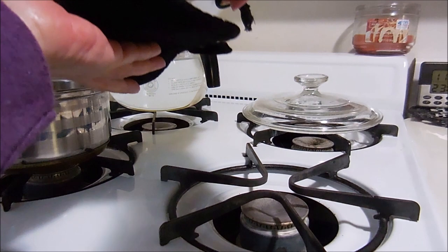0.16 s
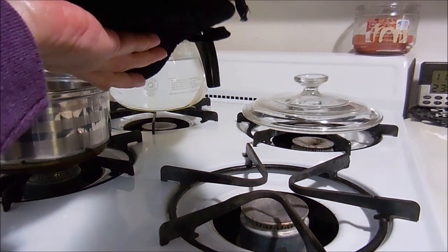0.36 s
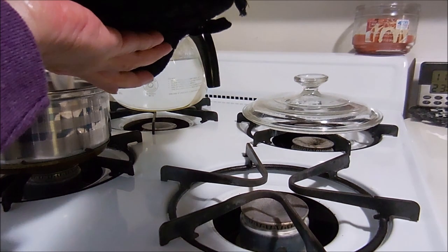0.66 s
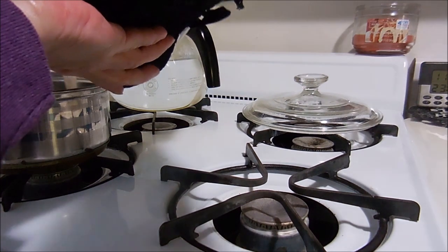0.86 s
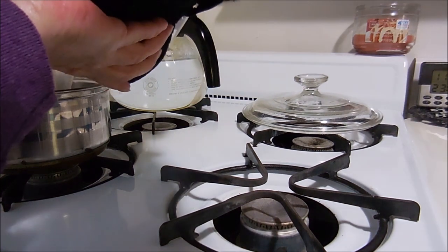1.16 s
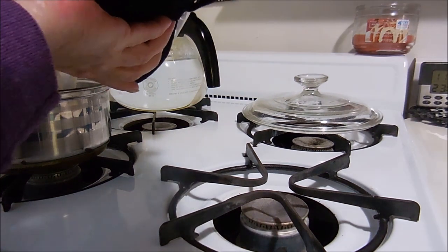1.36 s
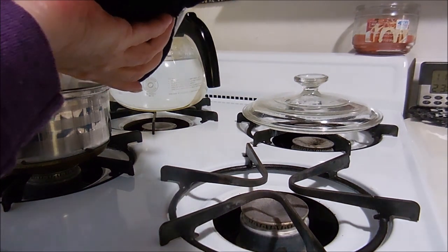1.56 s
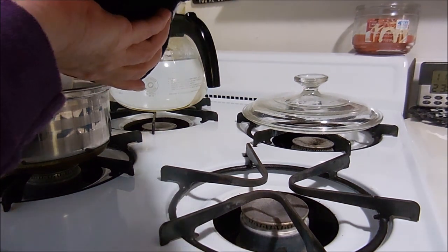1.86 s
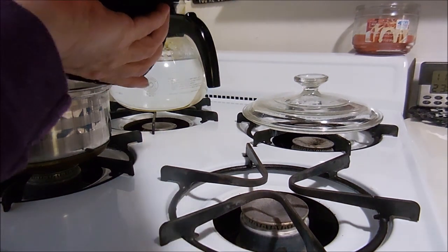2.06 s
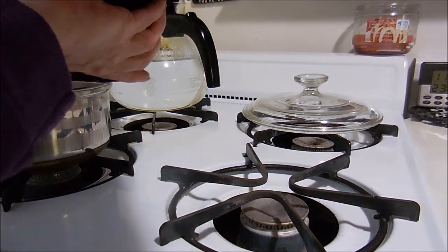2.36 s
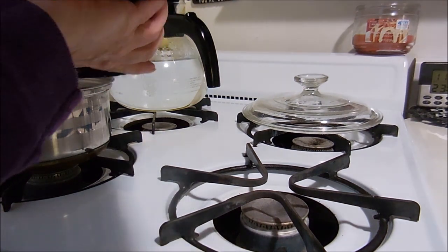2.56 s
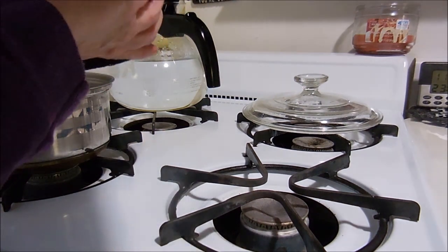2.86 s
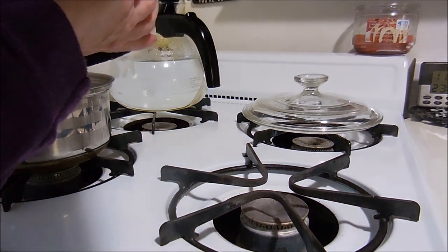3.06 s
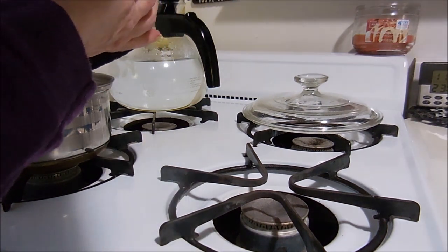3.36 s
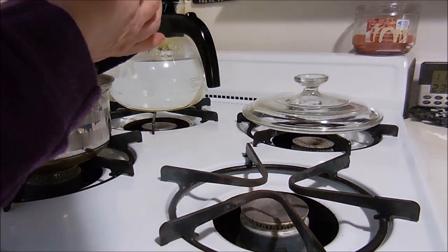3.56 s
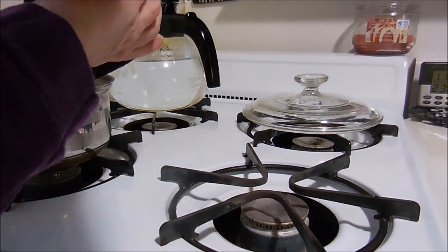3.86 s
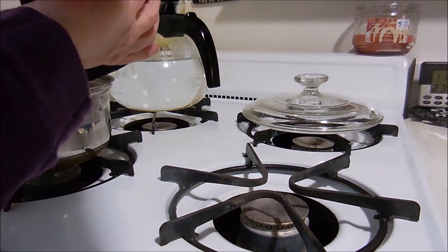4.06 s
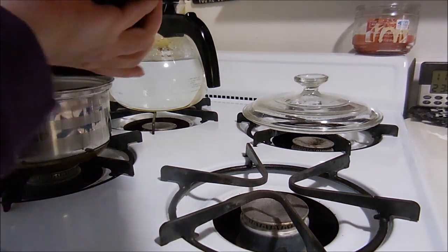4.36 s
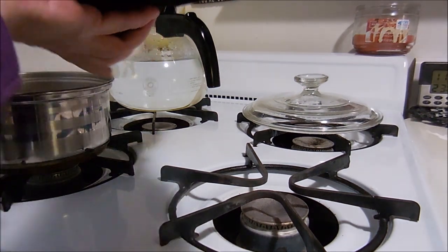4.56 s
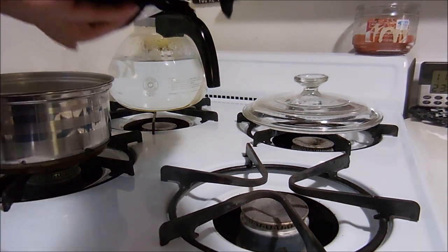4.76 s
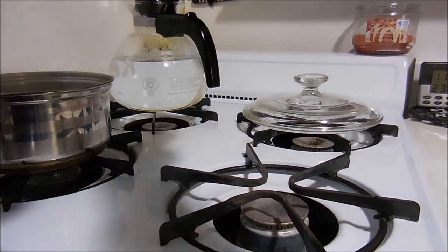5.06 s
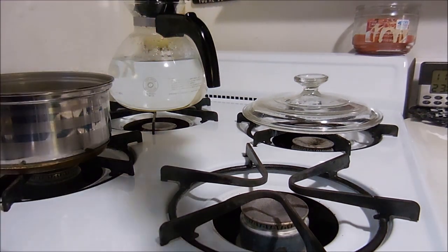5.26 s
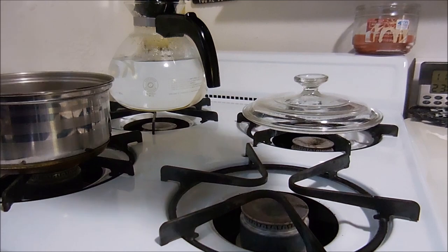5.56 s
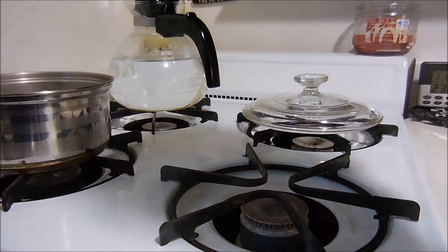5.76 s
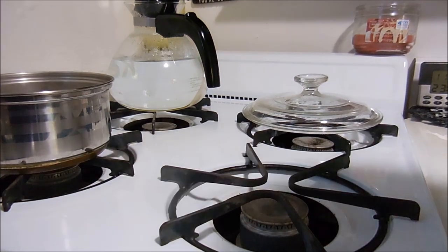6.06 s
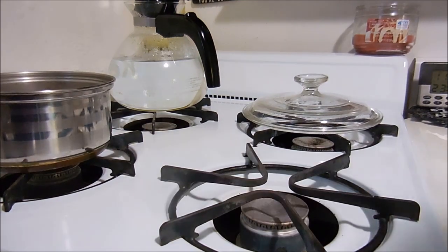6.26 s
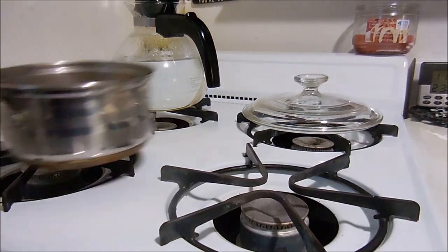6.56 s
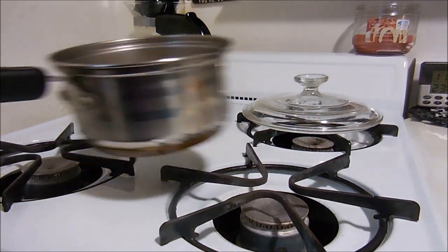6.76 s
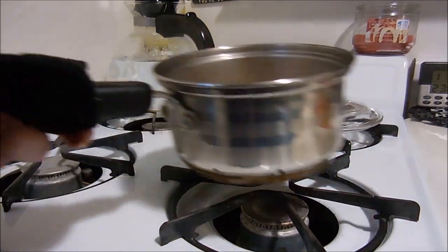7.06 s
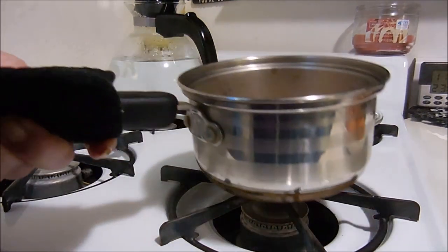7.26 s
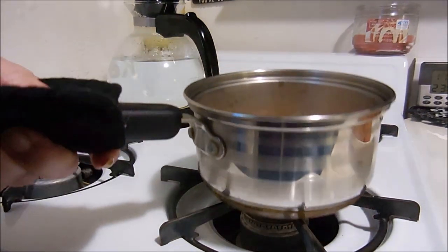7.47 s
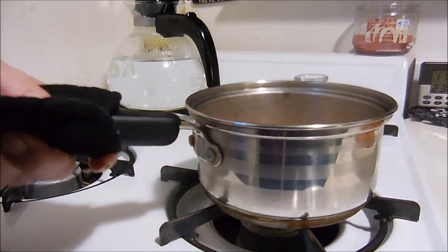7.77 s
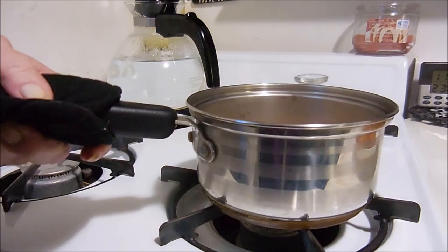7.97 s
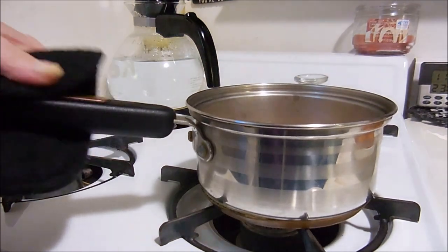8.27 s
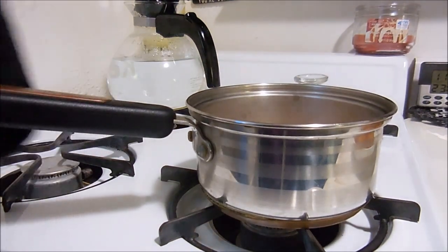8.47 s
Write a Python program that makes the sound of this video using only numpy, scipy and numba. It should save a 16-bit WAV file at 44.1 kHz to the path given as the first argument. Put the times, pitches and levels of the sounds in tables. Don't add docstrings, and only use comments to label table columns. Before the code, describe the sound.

Close stereo pickup in a small, hard kitchen, with quiet hiss and deep rumble. At about 0.5 s a dish clinks softly on a steel saucepan, with tiny dull bounces. Thick liquid slides in, its surges sloshing hollowly and gurgling, heaviest near 1.3 s and renewed around 1.9-2.1 s, with crisp spatters and spray off the metal wall. From 2.4 s it thins to a glugging trickle; a loud wide splash at 2.9 s leads into rapid round pops until about 3.65 s. Spray stops by 4 s, leaving near quiet but for faint dribbling around 4.8 s and a drip at 5. At 6.2-6.5 s the pan tugs, jolts sharply and scrapes off iron. Drips tick around 7. At 7.6 s it lands with a loud, bright, quickly damped clank, rocks with uneven knocks and pings until a firm seat at 8.07 s, then drags faintly. Slightly stronger rumble remains at the end.

```python
import sys
import numpy as np
from scipy import signal
from scipy.fft import rfft, irfft, next_fast_len
from scipy.io import wavfile
from scipy.ndimage import uniform_filter1d
from numba import njit

SR = 44100
rng = np.random.default_rng(int(sys.argv[2]) if len(sys.argv) > 2 else 0)


def materialize(psi):
    bounded = np.clip(np.atleast_2d(psi).T, -1, 1)
    quanta = np.round(bounded * 32767).astype(np.int16)
    wavfile.write(sys.argv[1], SR, quanta)


def volts_from_decibels(level):
    exponent = np.asarray(level, float) / 20
    return 10 ** exponent


N = 380583

# (time [s], level [dB])
RUMBLE = [
    (0, -60.5),
    (.5, -63),
    (2.6, -61),
    (3.9, -56),
    (6.6, -60),
    (7.0, -53.5),
    (8.63, -51.5),
]
# (frequency [Hz], level [dB per Hz])
ROOM_TONE = [(32, -18), (55, -36), (65, -11.5), (264, -13.5), (360, -13), (406, -13.5), (933, -13),
             (1050, -12.5), (1570, -15), (2200, -13.5), (5820, -17.5), (15100, -18.5), (16200, -15)]
# (frequency [Hz], level [dB])
PORTS_FAR = [(60, -17), (110, -2), (200, 1), (380, -3.5), (700, 0.5), (1290, -1), (2380, 1), (4400, 2),
             (8120, 0), (15000, 0.5)]
# (frequency [Hz], level [dB])
PORTS_CLOSE = [(60, -11), (110, -12), (200, -16), (380, -16), (700, -13), (1290, -12), (2380, -6),
               (4400, -2), (8120, -1), (15000, 1)]

# (time [s], peak [dB], brightness [dB], damping [0-1], low-mode weight [dB])
DISH_KNOCKS = [
    (.459, -26.5, -4, 0.04, -2.5),
    (.481, -37.5, -12, 0, -15),
    (.508, -39.5, -9, 0, -4),
    (.53, -46, -8.5, .1, -8),
]
# (frequency [Hz], level [dB], t60 [s])
DISH_KNOCK_MODES = [(345, 3.5, 0.24), (748, 10, 0.25), (930, 4, 0.23), (1110, 3, 0.22), (1490, 3, 0.2),
                    (1668, 2, 0.21), (2220, -6, 0.15), (2690, -8, 0.44), (3500, 2, 0.13), (4620, 8.5, 0.051),
                    (6080, 7, 0.046)]
# (frequency [Hz], level [dB per Hz])
DISH_COLOUR = [(59, -43), (100, -19), (350, -10), (648, -14), (1130, 2.5), (1390, -20), (2170, -14),
               (3780, -24.5), (6290, -24), (16000, -24)]

# (time [s], peak [dB], brightness [dB], damping [0-1], low-mode weight [dB])
LIFT_JOLTS = [
    (6.276, -16, 5, 0.15, -5),
    (6.284, -17.5, 3, 0.21, -1),
]
# (frequency [Hz], level [dB], t60 [s])
SIDE_GRATE_MODES = [(271, -4, 0.2), (448, -5, 0.18), (899, 2, 0.11), (1130, -3, 0.18), (1310, -4, 0.2),
                    (1615, -16, 0.15), (1730, -7, 0.15), (1860, -7.5, 0.22), (2260, 4, 0.14),
                    (2700, 11, 0.067), (2750, -9, 0.52), (3070, -4, .12), (3780, -3.5, 0.18),
                    (4800, -6, .1)]
# (frequency [Hz], level [dB per Hz])
SIDE_GRATE_COLOUR = [(47, -51.5), (80, -5.5), (453, 1.5), (604, -0.5), (882, -2.5), (1540, -1.5),
                     (1800, -3), (2400, -6), (10900, -8.5), (16200, -8.5)]
# (time [s], hold [s], pressure [dB], edge against body [dB])
SCRAPES = [
    (6.196, 0.012, -34.5, -11),
    (6.227, 0.016, -53, -4),
    (6.367, 0.021, -46, -7),
    (6.394, 0.034, -41, -4.5),
    (6.436, 0.047, -39, -5),
    (8.143, 0.088, -55, -0.5),
    (8.258, 0.11, -55, 1.5),
]
# (frequency [Hz], level [dB per Hz])
SCRAPE_COLOUR = [(59, -53), (100, -30), (463, -5.5), (561, -13.5), (1260, -6), (2050, -13), (9120, -21),
                 (10600, -23.5), (14600, -20), (16200, -33)]

# (time [s], peak [dB], brightness [dB], damping [0-1], low-mode weight [dB])
LANDING = [
    (7.61, -1.5, -7, 0.17, 1),
    (7.618, -6, 9, 0.13, -3),
    (7.629, -11.5, -1.5, 0.054, -2.5),
    (7.641, -19.5, -0.5, 0.08, 0.5),
]
# (frequency [Hz], level [dB], t60 [s])
GRATE_MODES = [(1013, 1.5, 0.094), (1093, 9.5, 0.06), (1150, -2, 0.18), (1257, 4, 0.062), (1340, -2, 0.21),
               (1600, -13, 0.26), (1880, -13.5, 0.16), (2277, -4.5, 0.22), (2895, 4.5, 0.081),
               (3225, -8.5, 0.23), (3600, -15, 0.45), (4188, -9, 0.11), (5028, -18, .15), (6115, -7, .086)]
# (frequency [Hz], level [dB per Hz])
GRATE_COLOUR = [(35, -53), (60, -28), (262, -16), (410, -13), (506, -21.5), (686, -16.5), (1070, -1),
                (1710, -10.5), (2060, -7), (3450, -12.5), (4680, -9), (8810, -9.5), (13800, -14.5),
                (16200, -22)]
# (time [s], peak [dB], brightness [dB], damping [0-1], low-mode weight [dB])
ROCKS = [
    (7.807, -13.5, -9.5, 0.31, 0),
    (7.825, -20, -14, .2, 4),
    (7.846, -11, -11, 0.033, -1.5),
    (7.881, -23, -11, 0.077, -7.5),
    (7.927, -17.5, -11, 0.085, -7.5),
    (7.991, -41, -15.5, .1, 6),
    (8.069, -13, -11, 0.24, -3),
]
# (frequency [Hz], level [dB], t60 [s])
ROCK_MODES = [(1071, 10, 0.067), (1150, 3, 0.11), (1283, 2.5, 0.11), (1330, 4, 0.14), (1400, -0.5, 0.19),
              (1990, -13, 0.14), (2220, 1.5, 0.091), (2570, -4, 0.089), (2650, -7, 0.19), (2970, -8.5, .14),
              (3200, -12, .14), (3860, -12, 0.099), (4550, -3.5, 0.25), (4530, -12, 0.21)]
# (frequency [Hz], t60 [s])
METAL_DECAY = [(100, 0.62), (400, 0.32), (1200, 0.23), (4000, 0.3), (9000, 0.056), (16000, 0.29)]
# (time [s], peak [dB], frequency [Hz], ring [s])
PINGS = [(6.395, -45, 2770, 0.12), (6.455, -42, 2800, .12), (6.51, -54, 2700, .3), (6.413, -40, 900, .1),
         (6.435, -38, 1150, .1), (6.456, -33, 1220, .08), (6.448, -45, 4800, .15),
         (6.212, -36, 2950, 0.027), (6.58, -59, 2770, .3), (6.278, -27, 3990, 0.088),
         (6.28, -29, 1852, 0.14), (7.615, -25, 396, 0.15), (7.62, -21, 2902, 0.092),
         (7.629, -16, 3050, .04), (7.622, -19, 2650, .05), (7.63, -27, 3225, 0.14),
         (.46, -47.5, 3500, 0.31), (.46, -40, 2220, .07), (.62, -59, 3500, .3), (1.36, -38.5, 770, 0.18),
         (7.611, -22, 6200, .04), (7.807, -19, 6380, .045), (7.822, -24.5, 2960, 0.055),
         (7.846, -16.5, 6700, 0.035), (7.847, -25.5, 2200, .08), (7.865, -29, 4550, .13),
         (7.895, -32, 4900, .1), (7.881, -17.5, 1330, 0.046), (7.927, -17, 6300, .03),
         (7.928, -22, 6400, 0.033), (7.927, -21, 2540, 0.056), (7.929, -27.5, 1992, 0.14),
         (7.94, -32, 4700, 0.15), (7.96, -43, 4900, .12), (7.99, -35, 1393, 0.059),
         (8.07, -26, 2568, 0.082), (8.07, -23.5, 3040, 0.067), (8.07, -35, 760, .08),
         (8.073, -23, 6750, 0.04), (8.074, -36, 4550, 0.12)]

# (time [s], peak [dB], centre [Hz])
SPATTERS = [(0.793, -18, 7140), (0.927, -32, 3150), (1.061, -35, 5840), (1.197, -35.5, 10600),
            (1.2284, -40, 4170), (1.347, -26, 5340), (1.414, -35, 2570), (1.517, -34.5, 12900),
            (1.539, -34, 5700), (1.7614, -43, 9700), (1.9837, -31, 7000), (2.216, -23, 5200),
            (2.8598, -28, 4300), (2.9672, -33, 12900), (3.0928, -26, 9800), (3.135, -24.5, 8260),
            (3.3194, -33, 10100), (3.4524, -24, 3660), (3.548, -40.5, 2900), (3.637, -37, 4100),
            (3.698, -39.5, 12800), (5.045, -34, 5940), (6.794, -36.5, 8300), (6.994, -24.5, 6870),
            (7.069, -35.5, 2220), (7.2333, -39.5, 13500), (7.2585, -42.5, 4830), (7.318, -35, 13200),
            (7.324, -38.5, 4480), (7.529, -31.5, 12000)]
# (time [s], peak [dB], centre [Hz], width [octaves], ring [s])
SPLASHES = [
    (1.205, -33, 5550, 0.8, 0.58),
    (1.265, -39, 4200, 0.67, 0.22),
    (1.875, -31, 5400, 0.79, 0.82),
    (2.166, -29, 2900, .4, 0.017),
    (2.88, -33, 7100, 0.23, 0.025),
    (2.011, -28, 7800, 0.34, .04),
    (2.909, -18, 10500, 1, 0.045),
    (2.911, -32.5, 2620, 1.0, 0.056),
    (3.452, -24.5, 9600, 0.5, .036),
]
# (time [s], peak [dB], centre [Hz])
FLICKS = [(1.0133, -43, 11700), (1.2682, -31, 9310), (1.3465, -31.5, 11500), (1.4084, -36.5, 12000),
          (1.5022, -37, 13500), (1.581, -31.5, 12300), (1.601, -36, 11500), (1.8289, -33, 8000),
          (1.8614, -35, 11600), (1.9821, -28.5, 13500), (2.1033, -31, 9500), (2.1333, -36, 9090),
          (2.1657, -28.5, 6400), (2.3428, -33, 10300)]
# (time [s], peak [dB], frequency [Hz], ring [s], glide [share])
BUBBLES = [(.619, -42, 870, 0.031, 0.049), (1.037, -46, 755, 0.049, .08),
           (1.308, -28.5, 1745, 0.019, 0.094), (1.346, -35.5, 746, 0.033, -0.041),
           (1.689, -33, 820, 0.019, 0.23), (1.690, -34, 1130, 0.012, 0.009),
           (1.758, -38.5, 1820, 0.024, 0.093), (1.818, -40, 2450, .015, 0.062),
           (1.825, -36.5, 1670, 0.028, -0.45), (1.836, -38.5, 940, 0.02, 0), (1.908, -38, 800, 0.036, .25),
           (1.905, -39, 420, 0.066, .2), (1.935, -38.5, 475, 0.063, -.2), (2.01, -45, 480, 0.075, 0),
           (1.93, -43, 705, .04, .2), (1.96, -33, 2600, .012, .2), (2.038, -39, 2550, .015, .1),
           (1.942, -29.5, 1750, .016, -0.064), (1.952, -29, 1686, 0.045, 0.019),
           (2.007, -30, 899, 0.036, 0.043), (2.037, -38, 1110, 0.033, 0.21),
           (2.113, -36, 1650, .025, -0.0094), (2.113, -38, 930, 0.022, 0.11), (2.128, -43, 1150, .04, .4),
           (2.176, -36, 2750, .02, 0), (2.183, -34, 1840, .025, 0), (2.213, -29.5, 1400, 0.012, -0.038),
           (2.215, -28, 1815, 0.015, 0.074), (2.212, -35, 3600, 0.037, 0.0022),
           (2.449, -42, 930, 0.027, 0.12), (2.55, -41, 958, 0.051, 0.023), (2.874, -41, 1150, 0.027, 0.038),
           (2.905, -38.5, 764, 0.04, 0.0049), (2.907, -36.5, 954, 0.028, 0.021)]
# (time [s], peak [dB], frequency [Hz])
DROPS = [(1.0355, -39, 3490), (1.5813, -33.5, 3090), (1.6147, -36, 3500), (2.0145, -33, 3150),
         (2.0805, -31, 3200), (2.522, -31.5, 3500), (3.0804, -39, 3430), (3.829, -43, 3280),
         (1.07, -46, 1650), (7.085, -46, 860), (7.138, -46, 1880)]
# (time [s], peak [dB], frequency [Hz], ring [s])
POPS = [(3.049, -35.5, 937, 0.023), (3.056, -36, 1264, 0.024), (3.093, -42.5, 1950, 0.016),
        (3.097, -41, 950, 0.046), (3.113, -49, 930, .04), (3.14, -51, 930, .03), (3.173, -37, 930, 0.021),
        (3.19, -29, 950, 0.024), (3.222, -40, 900, 0.028), (3.266, -38, 958, 0.034),
        (3.283, -38, 952, 0.022), (3.325, -44, 952, 0.044), (3.334, -40.5, 1224, .04),
        (3.364, -26.5, 933, 0.017), (3.403, -42, 907, 0.019), (3.43, -34.5, 930, 0.025),
        (3.453, -35.5, 960, 0.023), (3.453, -32, 1930, 0.008), (3.497, -43, 950, .035),
        (3.498, -42, 1950, 0.013), (3.515, -42, 930, 0.02), (3.534, -32.5, 900, 0.019),
        (3.549, -30.5, 930, 0.018), (3.569, -38.5, 883, 0.022), (3.625, -49, 930, 0.037),
        (3.641, -43, 970, 0.028)]
# (frequency [Hz], spread [Hz], level [dB])
GURGLE_SIZES = [(1230, 90, 3), (1480, 110, -1), (1900, 160, -3)]
# (time [s], hold [s], gurgle [dB])
GLUGS = [
    (2.4, 0.14, -61.5),
    (2.804, 0.16, -57),
    (3.016, 0.17, -52.5),
    (3.266, 0.26, -56.5),
    (3.607, 0.036, -75),
]
# (time [s], hold [s], slosh [dB], gurgle [dB])
SURGES = [
    (0.45, 0.027, -52.5, -50),
    (0.58, 0.14, -52.5, -62),
    (0.897, 0.066, -58.5, -73),
    (1.005, 0.098, -57, -73),
    (1.135, 0.15, -67, -85),
    (1.296, 0.096, -47.5, -51.5),
    (1.56, 0.34, -64, -72),
    (1.858, 0.081, -56.5, -63),
    (2.08, 0.083, -57, -59),
    (2.362, 0.018, -83, -62),
]
# (frequency [Hz], width [Hz], level [dB])
PAN_AIR = [(225, 43, -7), (271, 17.5, 1), (374, 60, 0.5), (480, 48, -2)]
# (time [s], flow [dB], thickness, coarse against fine spray [dB])
STREAM = [(.68, -74, -1), (.95, -63.5, 0), (1.7, -67.5, 7), (1.92, -53, 8), (2.06, -57, 8.5),
          (2.3, -56.5, 8.5), (2.68, -60, 4.5), (3.1, -62.5, 4.5), (3.6, -64, 5), (4.02, -94, -23),
          (4.55, -76, 6), (4.85, -66, 4), (5.1, -82, 11)]
# (time [s], hold [s], flow [dB])
GUSHES = [(0.73, 0.015, -62), (0.99, .03, -61.5), (1.058, 0.015, -53.5), (1.209, 0.087, -57),
          (1.338, 0.098, -57.5), (1.506, 0.025, -59), (1.572, 0.045, -59.5), (1.755, 0.012, -57.5),
          (1.815, 0.01, -71), (2.01, 0.055, -61), (2.098, 0.057, -60.5), (2.36, 0.091, -67),
          (2.483, 0.042, -63), (2.706, 0.063, -65), (2.858, 0.01, -55), (2.961, 0.0074, -52),
          (3.064, 0.11, -56), (3.26, 0.06, -60), (3.397, 0.027, -59.5), (3.65, 0.0073, -62),
          (3.77, 0.011, -63), (3.85, 0.055, -60)]
# (frequency [Hz], level [dB per Hz])
SPRAY_COLOUR = [(1060, 5.5), (1800, -6), (2090, -11), (3490, -4), (4080, -12), (5040, -6.5), (6580, 0),
                (15100, 0.5), (16200, -34)]
# (frequency [Hz], width [Hz], level [dB])
PAN_WALL = [(3560, 160, -5), (4400, 120, -9), (5600, 1600, -20)]


def level(x, db=0):
    return x * volts_from_decibels(db) / np.sqrt(np.mean(x ** 2))


def column(rows, index):
    return np.array(rows)[:, index]


def read(table, hz):
    return np.interp(np.log(np.maximum(hz, 1)), np.log(column(table, 0)), column(table, 1))


def curve(rows, index):
    db = np.interp(np.arange(N) / SR, column(rows, 0), column(rows, index), left=-150, right=-150)
    return volts_from_decibels(db)


def swells(rows, db, rise_s, fall_db_s):
    t, out = np.arange(N) / SR, 0
    for (s, hold, *_), top_db in zip(rows, db):
        rise = np.clip((t - s) / rise_s, 0, 1)
        falling_s = np.maximum(t - s - rise_s - hold, 0)
        out = out + rise ** 2 * volts_from_decibels(top_db - fall_db_s * falling_s)
    return out


def walk(rate):
    k = int(SR / rate)
    held = np.repeat(rng.standard_normal(N // k + 1), k)
    return uniform_filter1d(uniform_filter1d(held, k), k)[:N]


def colour(x, gain):
    size = next_fast_len(x.shape[-1])
    hz = np.arange(size // 2 + 1) * SR / size
    return irfft(rfft(x, size) * gain(hz), size)[..., :x.shape[-1]]


def bell(hz, octaves):
    return lambda f: np.exp(-(np.log2(np.maximum(f, 1) / hz) / octaves) ** 2)


def peaks(table):
    return lambda f: sum(volts_from_decibels(db) / np.abs(1 + 2j * (f - hz) / width) ** 2 for hz, width, db in table)


def add(out, s, sound):
    i = int(s * SR)
    out[..., i:i + sound.shape[-1]] += sound[..., :N - i]


def ports(mid, side, table):
    mid = colour(mid, lambda hz: 1 / np.sqrt(1 + volts_from_decibels(2 * read(table, hz))))
    side = colour(side, lambda hz: 1 / np.sqrt(1 + volts_from_decibels(-2 * read(table, hz))))
    return np.array([mid + side, mid - side])


@njit
def grains(start, hz, t60, size, glide, rise):
    out = np.zeros(N)
    for k in range(len(start)):
        phase = 0.
        for i in range(min(int(t60[k] * SR), N - start[k])):
            u = i / (t60[k] * SR)
            phase += 2 * np.pi * hz[k] * (1 + glide[k] * u) / SR
            out[start[k] + i] += size[k] * (1 - np.exp(-u / rise)) * np.exp(-6.9 * u) * np.sin(phase)
    return out


def background():
    tone = colour(rng.standard_normal((2, N)), lambda f: volts_from_decibels(read(ROOM_TONE, f)))
    rumble = colour(rng.standard_normal((2, N)), peaks([(27, 16, 0), (42, 12, 20 * np.log10(.5))]))
    hiss = level(ports(*tone, PORTS_FAR)) * volts_from_decibels(-53)
    rumble = level(ports(*rumble, PORTS_FAR)) * curve(RUMBLE, 1)
    return hiss + rumble * volts_from_decibels(2 * walk(3.03))


def kitchen(x):
    echo_t60_s, echo_db = .16, -10
    t = np.arange(int(.3 * SR)) / SR
    echo = rng.standard_normal((2, len(t))) * np.exp(-np.log(1000) * t / echo_t60_s) * (t > .002)
    echo = colour(ports(*echo, PORTS_CLOSE), lambda f: 1 / np.sqrt(1 + (f / 5000) ** 2))
    echo = echo / np.sqrt(np.sum(echo[0] ** 2))
    wet = signal.fftconvolve(echo, x[None], axes=1)[:, :N]
    low = colour(x, lambda f: 1 / (1 + (f / 6500) ** 6))
    housing = rng.standard_normal((2, 1024)) * np.exp(-np.arange(1024) / 70)
    common, apart = np.angle(rfft(housing))
    turn = np.pi / 4 + 0.18 * np.sin(apart)
    housing = irfft(np.exp(1j * (common + np.array([turn, -turn]))))
    treble = signal.fftconvolve(housing, (x - low)[None], axes=1)[:, :N]
    return np.array([low, np.roll(low, 2)]) + treble + volts_from_decibels(echo_db) * wet


def strike(modes, spectrum, modes_db, damping):
    t = np.arange(16384) / SR

    def fade(hz, t60):
        return np.exp(-np.outer(np.log(1000) / t60 + 60 * damping * np.sqrt(hz / 2000), t))

    hz, db, t60 = np.transpose(modes)
    common_and_apart_db = np.array([[0], [-4]])
    stir = volts_from_decibels(db + modes_db + 2.5 * rng.standard_normal(len(hz)) + common_and_apart_db)
    phase = 2 * np.pi * rng.random((2, len(hz), 1))
    ringing = np.sin(2 * np.pi * np.outer(hz, t) + phase) * fade(hz / 4, np.clip(t60, .03, .45))
    lines = np.einsum("cm,cmt->ct", stir, ringing)
    noise = level(colour(rng.standard_normal((2, len(t))), lambda f: volts_from_decibels(read(spectrum, f))))
    crowd = 0
    for f in 62.5 * 2 ** np.arange(0, 8.1, .5):
        crowd = crowd + colour(noise, bell(f, .6)) * fade(f, read(METAL_DECAY, f))
    return ports(*(lines + crowd), PORTS_CLOSE) * np.minimum(t / 0.00067, 1)


def knocks(rows, modes, spectrum, modes_db, bass_db):
    rattle_s = 0.0076
    out = np.zeros((2, N))
    t = np.arange(int(.06 * SR)) / SR
    for s, db, treble_db, damping, low_db in rows:
        contacts = (rng.random(len(t)) < .012) * rng.standard_normal(len(t)) * np.exp(-t / rattle_s)
        contacts[0] = 2.4
        shelves = [(350, bass_db), (800, low_db), (1500, low_db), (1900, 0), (3000, 0), (10000, treble_db)]
        shaped = [(f, level_db + read(shelves, f)) for f, level_db in spectrum]
        weighted = [(f, mode_db + low_db * (f < 1500), t60) for f, mode_db, t60 in modes]
        blow = strike(weighted, shaped, modes_db, damping)
        sound = signal.fftconvolve(blow, contacts[None], axes=1)
        onset = np.sqrt(np.mean(sound[:, :600] ** 2))
        add(out, s, sound * volts_from_decibels(db) / onset * 0.5)
    return out


def scrapes():
    slips = level((rng.random(N) < .03) * rng.standard_normal(N) * volts_from_decibels(2 * walk(60)))
    ring = strike(SIDE_GRATE_MODES, SCRAPE_COLOUR, modes_db=-20, damping=0.7)
    press_db, edge_db = np.transpose(SCRAPES)[2:]
    body = (675, 4250, press_db)
    edge = (4250, SR, press_db + edge_db)
    drum = (0, 675, press_db - 10)
    out = 0
    for lo, hi, db in (body, edge, drum):
        part = colour(ring, lambda f: (f >= lo) * (f < hi))
        part = part / np.sqrt(np.sum(part[0] ** 2))
        push = swells(SCRAPES, db, rise_s=0.0049, fall_db_s=369)
        out = out + signal.fftconvolve(part, (slips * push)[None], axes=1)[:, :N]
    return volts_from_decibels(-1) * out


def spatters(rows):
    out = np.zeros(N)
    t = np.arange(8192) / SR
    for s, db, hz, octaves, ring in rows:
        noise = rng.standard_normal(len(t))
        rise_s = max(2.1 / hz, (ring - .1) / 20)
        burst = level(colour(noise, bell(hz, octaves)))
        burst = burst * np.minimum(t / rise_s, 1) * np.exp(-np.log(1000) * t / ring)
        snap = level(colour(noise, bell(hz, 1.2)), -7) * np.exp(-t / 0.004)
        both = burst + snap
        add(out, s, both * volts_from_decibels(db + 0.5) / np.abs(both).max())
    return out


def tones(rows, gain_db, swell):
    s, db, hz, ring, glide = np.transpose(rows).copy()
    return grains((s * SR).astype(np.int64), hz, np.clip(ring, .005, .5), volts_from_decibels(db + gain_db), glide, swell)


def bubbles():
    drops = []
    for s, db, hz in DROPS:
        ring = 0.024 * 2 ** (-(db + 38) / 32) * (hz / 1000) ** -.45
        drops.append((s, db, hz, ring, 0.05))
    pops = [(s, db + 15, hz, ring * 1.3, .09) for s, db, hz, ring in POPS]
    pings = [(*row, 0) for row in PINGS]
    return tones(list(BUBBLES) + drops, 9, .23) + tones(pops, 0, .5) + tones(pings, 0, .01)


def gurgle(count=6000):
    kind = np.array(GURGLE_SIZES)[rng.integers(0, len(GURGLE_SIZES), count)]
    when, pitch = rng.random(count), rng.standard_normal(count)
    size, ring = rng.exponential(size=count), rng.random(count)
    loudness = volts_from_decibels(kind[:, 2] + 3 * np.minimum(size, 2))

    def crowd(when, hz):
        start = (when * N).astype(np.int64)
        return level(grains(start, hz, (15 + 25 * ring) / hz, loudness, np.full(count, .05), .12))

    small = crowd(when, kind[:, 0] + kind[:, 1] * pitch)
    big = crowd(when[::-1].copy(), 900 * 1.12 ** pitch)
    surges = swells(SURGES, column(SURGES, 3), rise_s=0.037, fall_db_s=199)
    glugs = swells(GLUGS, column(GLUGS, 2), rise_s=0.024, fall_db_s=148)
    return small * (surges + glugs) + big * surges * volts_from_decibels(-1)


def slosh():
    surge = rng.standard_normal(N) * volts_from_decibels(2.6 * walk(30.53))
    flow = swells(SURGES, column(SURGES, 2), rise_s=0.037, fall_db_s=199)
    overtone = level(colour(surge, peaks([(764, 49, 0)])), -1) * np.minimum(flow / volts_from_decibels(-41.5), 1)
    return (level(colour(surge, peaks(PAN_AIR))) + overtone) * flow


def spray(count=5000):
    when, pitch, size = rng.random(count), rng.random(count), rng.exponential(size=count)
    hz = 4200 * 3.5 ** pitch
    start, loudness = (when * N).astype(np.int64), volts_from_decibels(4 * np.minimum(size, 2.5))
    fizz = level(grains(start, hz, 22 / hz, loudness, np.full(count, .2), 0.07), -8)
    throb = volts_from_decibels(2 * walk(50))
    hiss = 0
    for centre_hz in (2200, 4400, 8800, 15000):
        band = rng.standard_normal(N) * throb * volts_from_decibels(3.5 * walk(40))
        hiss = hiss + colour(band, bell(centre_hz, .7))
    wall = peaks(PAN_WALL)
    both = colour(level(hiss, -3) + fizz, lambda f: volts_from_decibels(read(SPRAY_COLOUR, f)) * (1 + wall(f)))
    fine = colour(both, lambda f: 1 / np.sqrt(1 + (6500 / (f + 1)) ** 8))
    coarse = level(both - fine, -3.5) * curve(STREAM, 2)
    gushes = swells(GUSHES, column(GUSHES, 2), rise_s=0.0024, fall_db_s=355)
    return (curve(STREAM, 1) + gushes) * (level(fine, 4.8) + coarse)


def scene():
    liquid = spray() + slosh() + gurgle() + bubbles()
    liquid = liquid + spatters([(*row, 0.28, 0.03) for row in SPATTERS] + list(SPLASHES))
    landing = knocks(LANDING, GRATE_MODES, GRATE_COLOUR, modes_db=-4, bass_db=-2)
    rocking = knocks(ROCKS, ROCK_MODES, GRATE_COLOUR, modes_db=-3, bass_db=-1.7)
    lifting = knocks(LIFT_JOLTS, SIDE_GRATE_MODES, SIDE_GRATE_COLOUR, modes_db=-9, bass_db=-12.5) + scrapes()
    dish = knocks(DISH_KNOCKS, DISH_KNOCK_MODES, DISH_COLOUR, modes_db=-5, bass_db=-4.5)
    metal = landing + rocking + lifting + dish
    close = kitchen(liquid) + metal + background()
    return close + kitchen(spatters([(*row, .5, .04) for row in FLICKS]))


def roll_off(x):
    return signal.sosfilt(signal.butter(12, 16650, fs=SR, output="sos"), x)


def record(dry):
    rounded = .86 * np.tanh(dry / .86)
    mix = colour(rounded, lambda f: np.where(f < 15750, 1, volts_from_decibels(-31)))
    return roll_off(mix)


dry = scene()
out = record(dry)
materialize(out)
```